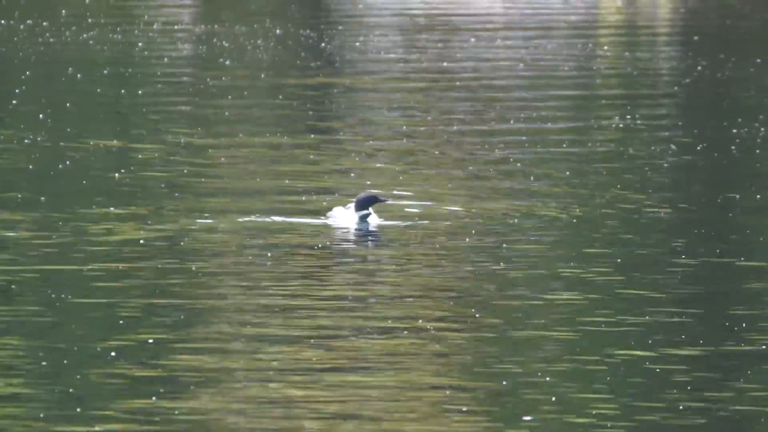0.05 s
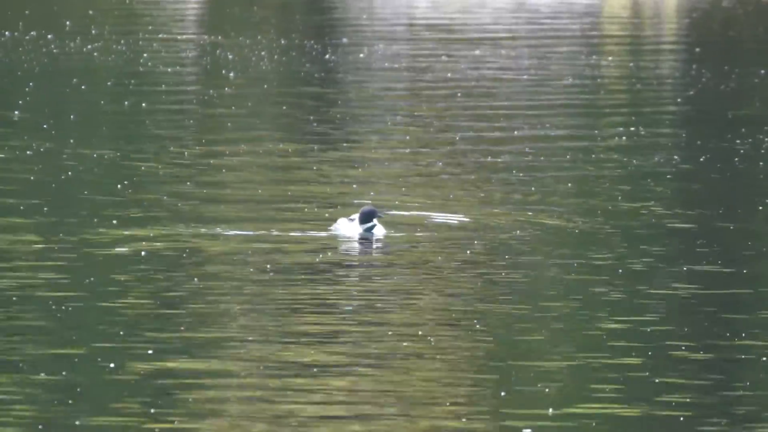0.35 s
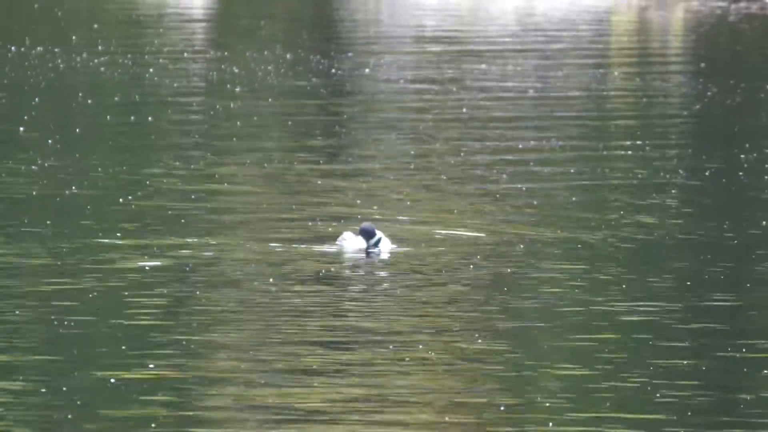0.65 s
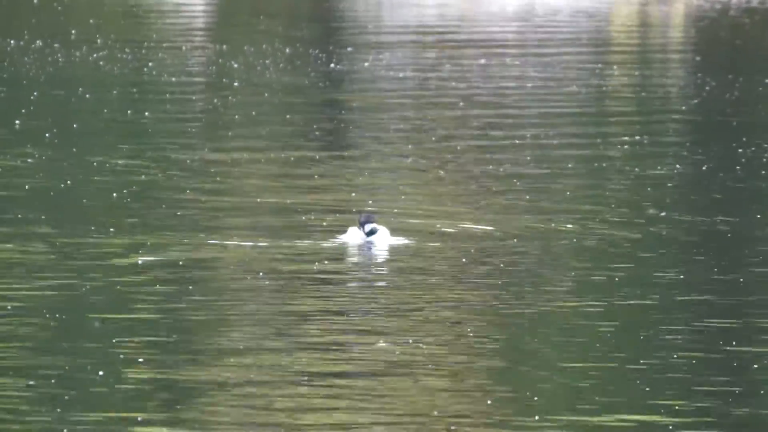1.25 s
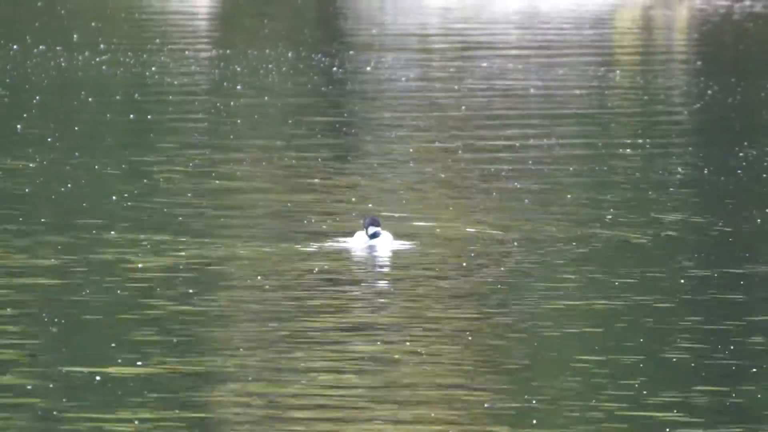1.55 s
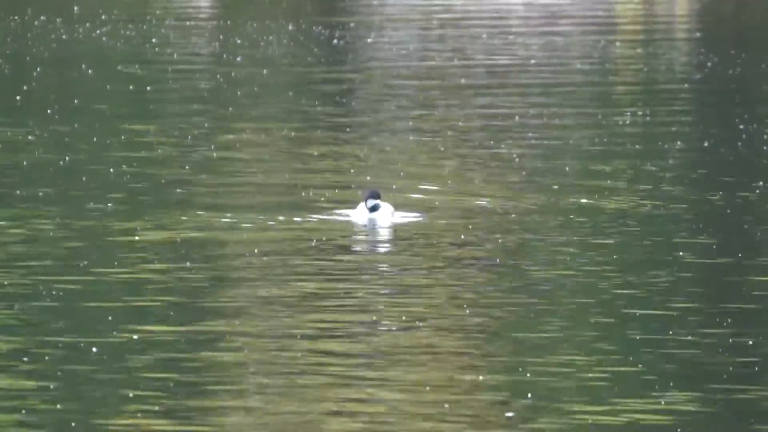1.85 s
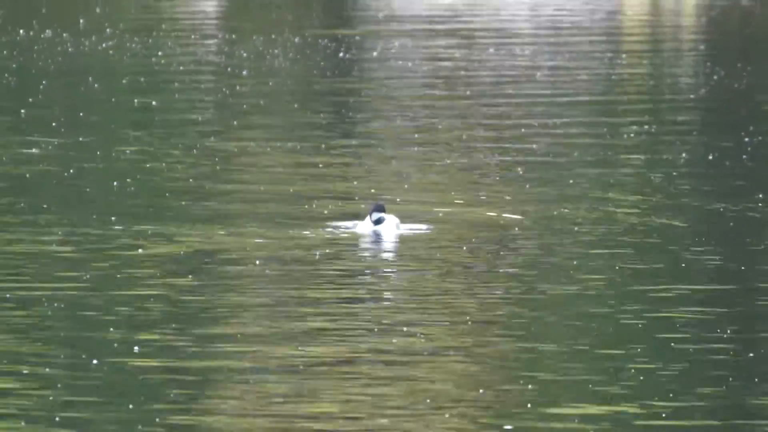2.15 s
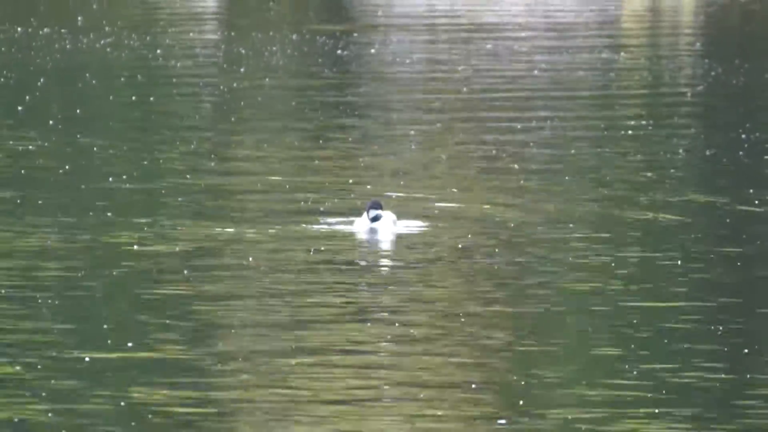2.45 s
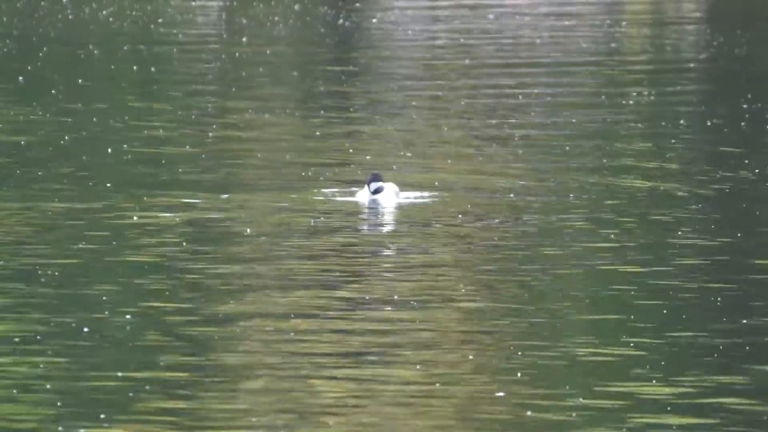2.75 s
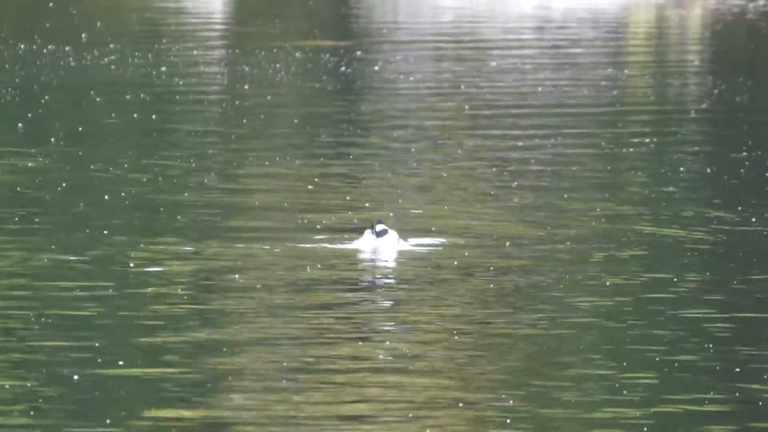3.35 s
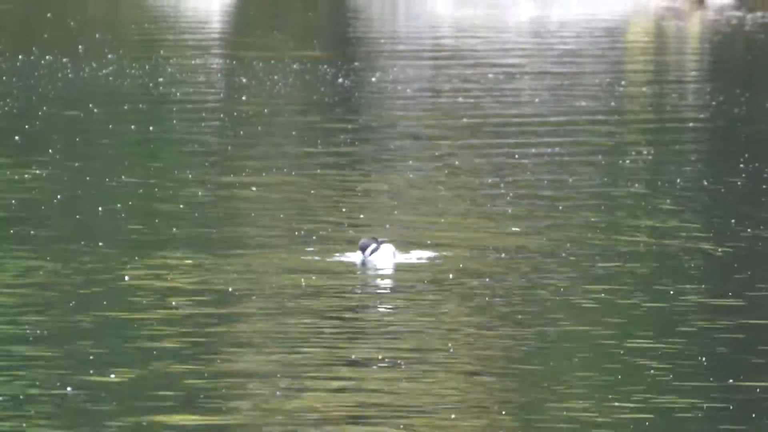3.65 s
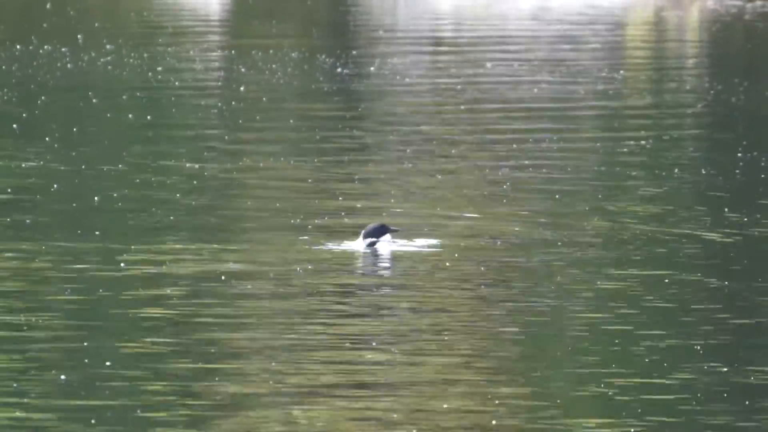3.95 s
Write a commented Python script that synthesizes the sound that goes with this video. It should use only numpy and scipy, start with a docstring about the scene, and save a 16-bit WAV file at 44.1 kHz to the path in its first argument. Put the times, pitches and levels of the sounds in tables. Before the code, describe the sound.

Quiet outdoor wind and water noise, broken by a small button pressed and released.

```python
"""A quiet lake shore: a steady far rush of wind and water, coloured by the hollows round a camera's
two microphones. The camera's electronics whine very faintly on the left. A small button on its
right is pressed and let go; each click rings the plastic case for a few milliseconds."""
import sys
import numpy as np
from scipy import signal
from scipy.fft import rfft, irfft
from scipy.io import wavfile
from scipy.ndimage import uniform_filter1d

SR = 44100
rng = np.random.default_rng(int(sys.argv[2]) if len(sys.argv) > 2 else 0)


def log_audio(samples):
    """Write samples as a 16-bit WAV file to the path given in sys.argv[1]."""
    # one column per channel
    frames = np.atleast_2d(samples).T
    # limit to full scale, then quantise
    limited = np.clip(frames, -1, 1)
    pcm = np.round(limited * 32767).astype(np.int16)
    wavfile.write(sys.argv[1], SR, pcm)


N = 176400


def undb(db):
    """dB to gain."""
    return 10 ** (np.asarray(db) / 20)


def unit(x):
    """Scale to rms 1."""
    return x / np.sqrt(np.mean(x ** 2))


def bins_hz():
    """FFT bin frequencies, floored at 1 Hz."""
    return np.maximum(np.arange(N // 2 + 1) * SR / N, 1)


def curve(points):
    """Interpolate (freq_hz, value) onto the bins, log-frequency axis."""
    freq_hz, value = np.array(points, float).T
    return np.interp(np.log(bins_hz()), np.log(freq_hz), value)


def band_noise(centre_hz, width_oct, shape=(2, N)):
    """Noise in a bell-shaped band, rms 1."""
    bell = np.exp(-.5 * (np.log2(bins_hz() / centre_hz) / width_oct) ** 2)
    return unit(irfft(rfft(rng.standard_normal(shape)) * bell, N))


def wander(rate_hz):
    """Random steps, smoothed twice, rms 1."""
    hold = int(SR / rate_hz)
    steps = np.repeat(rng.standard_normal(200), hold)[:N]
    return unit(uniform_filter1d(uniform_filter1d(steps, hold), hold))


def decay(age_s, t60_s):
    """Exponential fall, 60 dB in t60_s."""
    return np.exp(-np.log(1000) * age_s / t60_s)


def rush_band(spectrum, passband, level_db):
    """One band of the rush: partly shared by both microphones, swelling and flickering slightly."""
    # Likeness of the microphones: freq_hz, share_0_to_1
    likeness = [(100, 0.9), (330, 0.85), (800, 0.73), (1000, 0.75), (1370, 0.3), (1620, 0.55), (2200, 0.4),
                (2400, .42), (2560, 0.3), (2950, 0.59), (3170, 0.4), (3480, 0.4), (3750, 0), (4000, 0.3),
                (4300, 0.08), (4650, 0.5), (5100, .08), (14000, 0)]
    # Balance: freq_hz, left_minus_right_db
    balance = [(100, -7), (220, -1.5), (400, -4.5), (520, 0), (650, -1), (900, -3), (1400, -3), (1900, 2),
               (2200, -4.5), (2400, -10), (2630, 1), (2950, -1), (3080, -11.5), (3500, -3), (3850, 2.5),
               (4200, 1.5), (4500, -3.5), (5000, -1.5), (13000, 0)]
    # Right microphone behind left: freq_hz, lag_rad
    phase_lag = [(100, .05), (400, .4), (500, 1.03), (700, 0.37), (950, 0.99), (1350, 0.82), (1500, 1.38),
                 (2250, 1.5), (2400, 2.6), (2620, 0.91), (2780, 2.5), (3000, 2.08), (3400, 3.6),
                 (4100, 3.3), (4600, 6.4)]
    share, tilt, lag_rad = curve(likeness), undb(curve(balance) / 2), curve(phase_lag)
    mid, side = rfft(rng.standard_normal((2, N))) * np.sqrt([1 + share, 1 - share])
    pair = np.array([(mid + side) * tilt, (mid - side) / tilt * np.exp(-1j * lag_rad)])
    sum_gain = np.sqrt(1 + share * np.cos(lag_rad))
    noise = unit(irfft(pair / sum_gain * undb(curve(spectrum)) * passband, N))
    swell_db = -0.23 * wander(rate_hz=0.57)
    flicker_db = 0.5 * wander(rate_hz=13)
    return noise * undb(level_db + swell_db + flicker_db)


def rush():
    """Distant wind and water: low roar, thin hiss, a trace of rumble."""
    # Roar at the microphones, humps and notches: freq_hz, relative_db
    roar_spectrum = [(88, -54), (150, -23), (225, -6.5), (284, -1), (333, 0), (394, -0.5), (463, -3),
                     (525, -1), (603, -8.5), (778, -1), (894, -2), (1110, -5.5), (1220, -10), (1370, -21),
                     (1600, -12), (1900, -11), (2470, -41), (4180, -120)]
    # Hiss at the microphones: freq_hz, relative_db
    hiss_spectrum = [(710, -30), (1200, 0), (1370, -10.5), (1610, 1), (1800, 1), (2190, -3.5),
                     (2380, -22.5), (2540, -5), (2680, -2.5), (2790, -4.5), (2950, 1), (3100, -8.5),
                     (3260, -10.5), (3470, -16.5), (3810, -7), (4000, -9.5), (4200, -7), (4650, -8.5),
                     (5230, -12.5), (9950, -21), (13400, -26.5), (13800, -27.5)]
    freq_hz, split_hz = bins_hz(), 1400
    roar = rush_band(roar_spectrum, (freq_hz > 20) & (freq_hz < split_hz), level_db=-55)
    hiss = rush_band(hiss_spectrum, (freq_hz >= split_hz) & (freq_hz < 14100), level_db=-59)
    rumble = undb(-87) * band_noise(centre_hz=56, width_oct=0.76, shape=N)
    return roar + hiss + rumble


def whine():
    """Camera electronics: two thin tones of varying level, left only."""
    # Tones: pitch_hz, base_rms_db
    partials = [(10406, -99), (13033, -86)]
    # Swell of both tones: time_s, gain_db
    swell = [(0, -20), (1, -17), (1.12, 3), (1.25, -13), (1.6, -8), (1.8, -13), (3.2, -16), (3.38, 0),
             (3.55, 1), (3.7, 4.5), (3.87, 7.5), (4, 6.5)]
    t = np.arange(N) / SR
    tones = sum(np.sqrt(2) * undb(db) * np.sin(2 * np.pi * hz * t) for hz, db in partials)
    gain = undb(np.interp(t, *np.array(swell).T))
    return np.array([[1], [0]]) * tones * gain


def case_ring(age_s, bright_hz, width_oct, pitch_ratio, pan_db):
    """Damped modes of the snapped plastic case, weighted towards bright_hz."""
    # Case modes: pitch_hz, gain_db, t60_s, left_minus_right_db
    modes = [(1677, -15, 0.015, 5), (1987, -9, 0.0055, -3.5), (2853, -12, 0.016, -0.5),
             (3960, -5, 0.0061, -12.4), (4023, 6.2, 0.0039, -13), (5350, -4.5, 0.0058, -19),
             (5560, -0.8, 0.0038, -14), (7330, -9, 0.0037, -7.7), (8790, -18.6, 0.0072, -7),
             (10200, -22.5, 0.0045, -3), (12410, -12, 0.0044, -8.3)]
    ring = np.zeros((2, N))
    active = (age_s > 0) & (age_s < .1)
    t = age_s[active]
    for k, (pitch_hz, gain_db, t60_s, side_db) in enumerate(modes):
        colour = 1 / (1 + (np.log2(pitch_hz / bright_hz) / width_oct) ** 2) ** 2
        mode = (-1) ** k * np.sin(2 * np.pi * pitch_hz * pitch_ratio * t) * decay(t, t60_s)
        ring[:, active] += undb([[side_db + pan_db], [0]]) * undb(gain_db) * colour * mode
    return ring


def button():
    """Press and release: each snap rings the case, with a rub, an after-ring and a dull body knock."""
    # Snaps: start_s, gain_db, contact_s, bright_hz, width_oct, pitch_ratio,
    # left_minus_right_db, after_ring_db, knock_db
    clicks = [(2.5954, -9.5, 0.00013, 4330, 1.76, 0.996, -5.5, -53, -39),
              (2.7284, -11.5, 0.00054, 3680, 0.57, 1.019, -14, -35.5, -32.5)]
    t, out = np.arange(N) / SR, np.zeros((2, N))
    radiation = signal.butter(3, 1540, "high", fs=SR, output="sos")  # small case: little bass
    to_right = undb([[-5], [0]])
    for start_s, gain_db, contact_s, bright_hz, width_oct, ratio, pan_db, after_db, knock_db in clicks:
        age_s = np.maximum(t - start_s, 0)
        attack = 1 - np.exp(-age_s / contact_s)
        ring = case_ring(age_s, bright_hz, width_oct, ratio, pan_db)
        snap = signal.sosfilt(radiation, attack * ring + 1e-18)
        # The button rubs just before and after it snaps.
        lead_s = np.maximum(start_s - t, 0)
        rub_envelope = np.exp(-lead_s / (3.6 * contact_s) - age_s / 0.003)
        rub = undb(-28) * band_noise(bright_hz, width_oct=0.78) * rub_envelope
        after_ring = undb(after_db) * band_noise(centre_hz=3980, width_oct=0.23) * decay(age_s, 0.16)
        knock = undb(knock_db) * band_noise(centre_hz=883, width_oct=0.28) * decay(age_s, 0.087)
        out += undb(gain_db) * (snap + attack * knock + to_right * (rub + attack * after_ring))
    return out


def scene():
    """Shore rush plus the camera's own small sounds."""
    return rush() + whine() + button()


def record(dry):
    """Steep treble cut and a slight DC offset."""
    cutoff_hz, dc_offset = 16300, -.0025
    lowpass = signal.ellip(8, .2, 70, cutoff_hz, fs=SR, output="sos")
    return signal.sosfilt(lowpass, dry) + dc_offset


dry = scene()
out = record(dry)
log_audio(out)
```